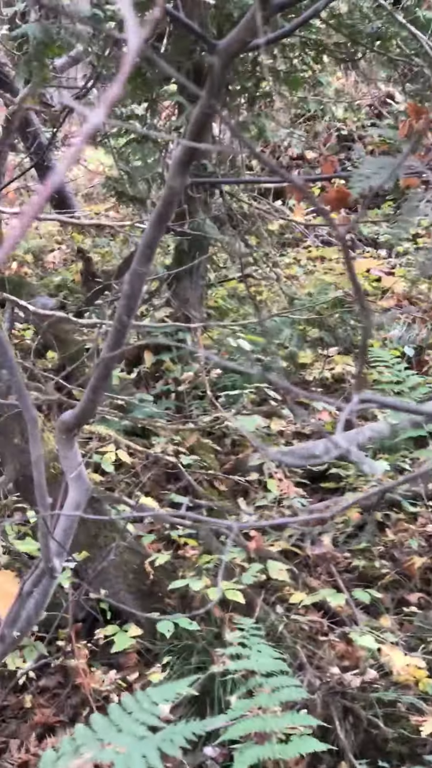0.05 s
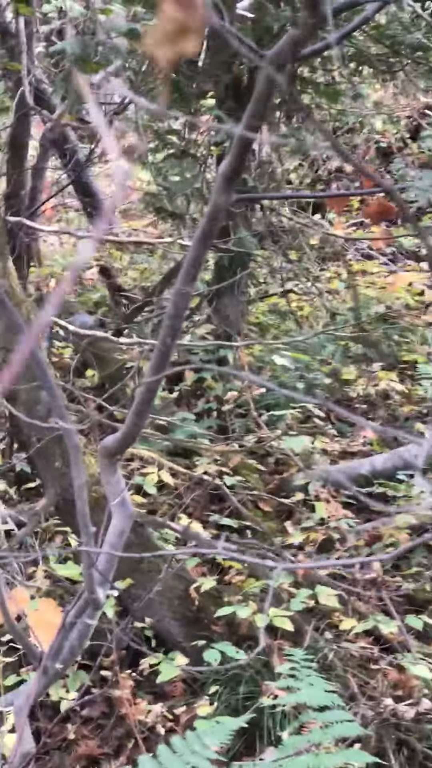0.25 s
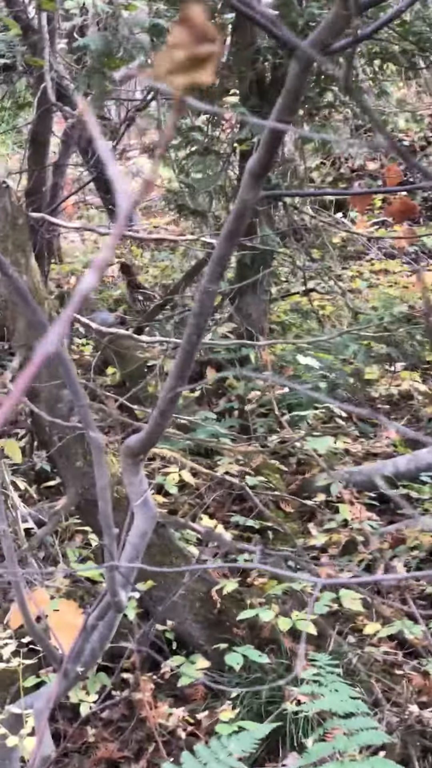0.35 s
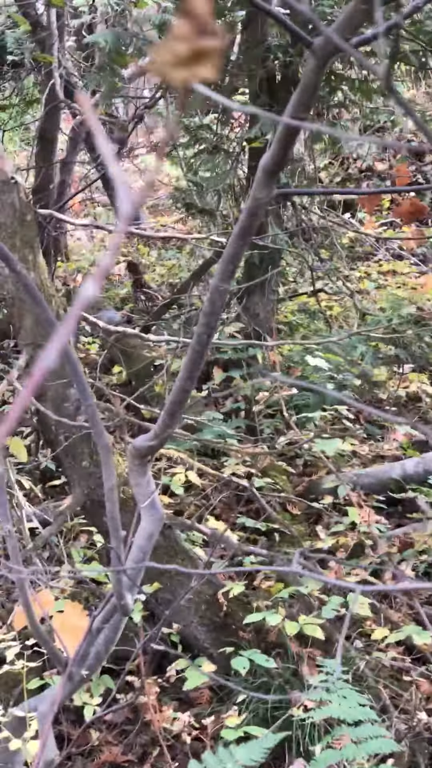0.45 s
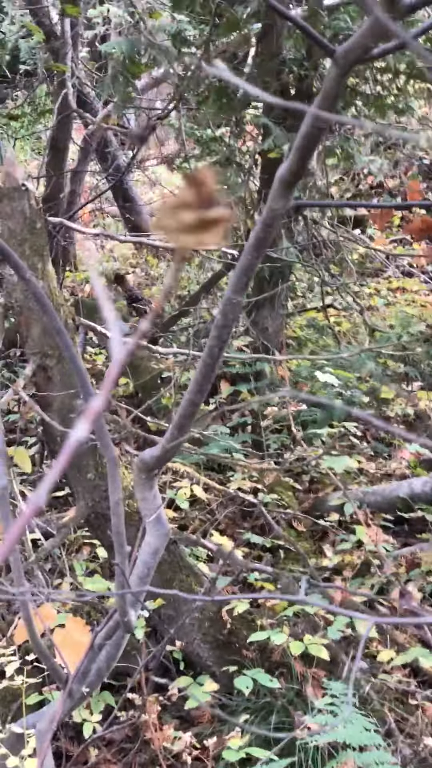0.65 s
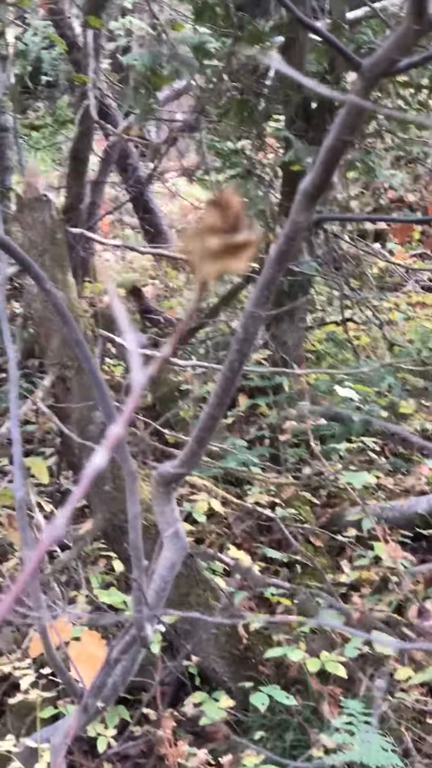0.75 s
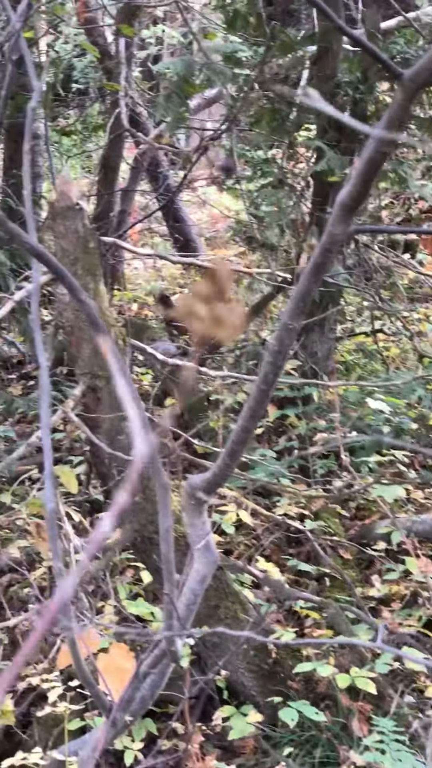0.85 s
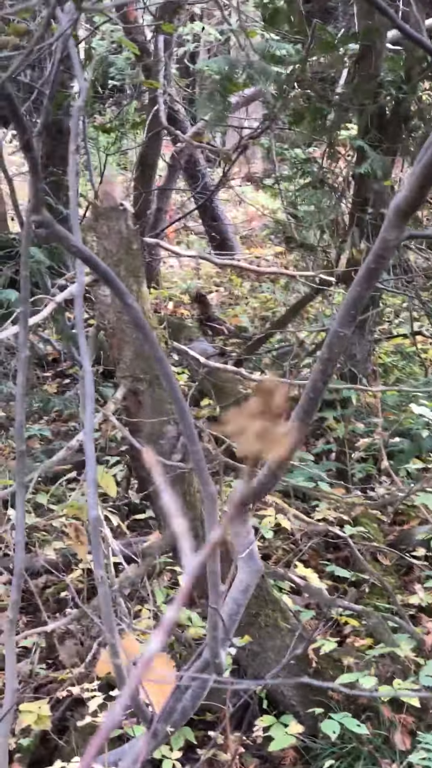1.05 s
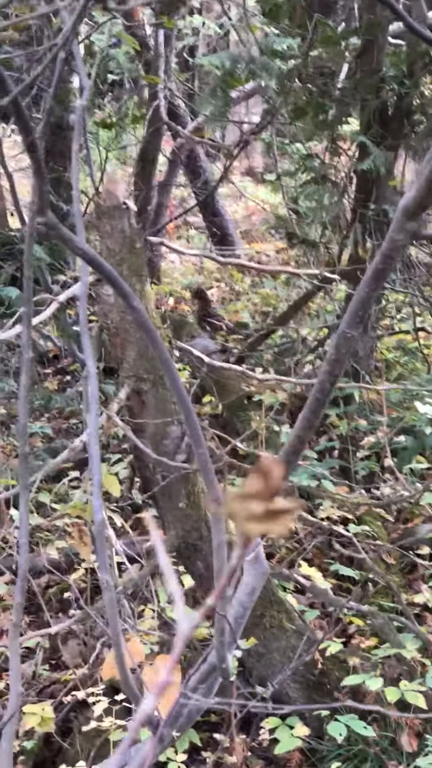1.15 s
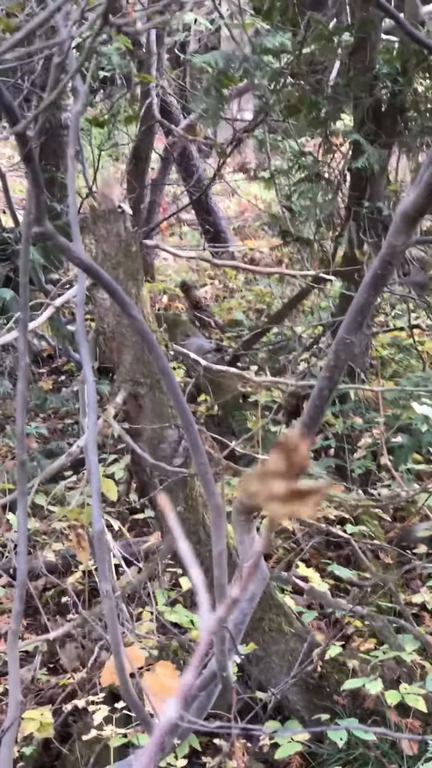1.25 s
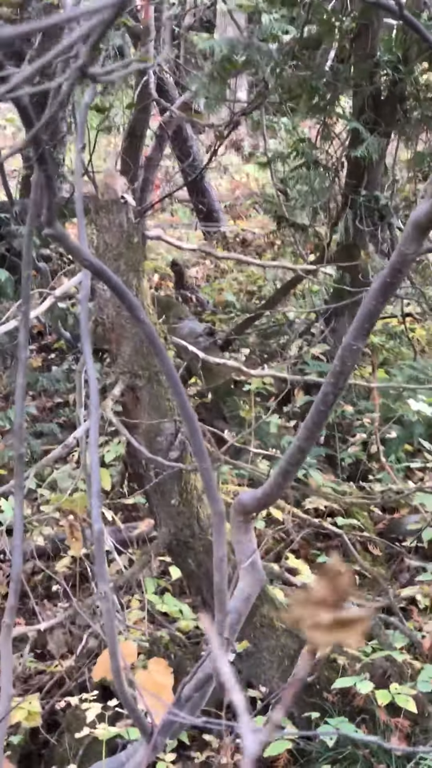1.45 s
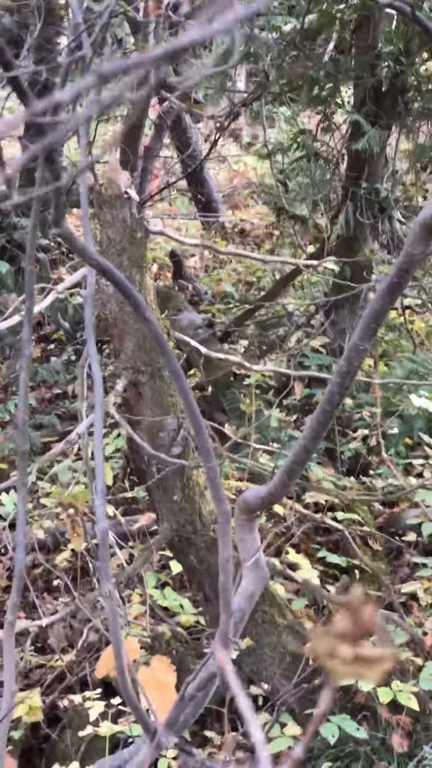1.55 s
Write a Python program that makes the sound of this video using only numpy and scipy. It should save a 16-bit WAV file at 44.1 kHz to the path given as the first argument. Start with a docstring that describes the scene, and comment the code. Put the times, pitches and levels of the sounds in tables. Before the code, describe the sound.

Dry twigs snap sharply underfoot among crisp leaves in a quiet autumn wood

```python
"""A walker shifts weight on dry leaves and twigs in a quiet wood, over a faint rustle and still air.
First come a few twig cracks with low thuds of weight, and a far bird gives a short rising whistle.
Near a quarter second many twigs snap in a rush, each a click with a knock that falls in pitch,
while leaves scrape in bursts of tiny grains. Fewer snaps, scrapes and thuds follow, weaker later on;
the bird whistles again, the last time near the end, just before a last soft thud."""
import sys
import numpy as np
from scipy import signal
from scipy.io import wavfile

SR = 44100
rng = np.random.default_rng(int(sys.argv[2]) if len(sys.argv) > 2 else 0)


def boost_factor(decibels):
    """Convert a level in decibels to a linear amplitude factor."""
    exponent = np.asarray(decibels, float) / 20
    return 10 ** exponent


def to_wav(s):
    """Save 16-bit WAV."""
    ch = np.atleast_2d(s).T  # columns
    pcm = np.round(np.clip(ch, -1, 1) * 32767)  # PCM
    wavfile.write(sys.argv[1], SR, pcm.astype(np.int16))


N = 70560  # samples, 1.6 s


def rms_one(x):
    """Scale a sound to an rms of 1."""
    return x / np.sqrt(np.mean(x ** 2) + 1e-20)


def add(out, start_s, x):
    """Mix a short sound into a longer one, cutting what runs past the end."""
    i = int(start_s * SR)
    out[i:i + len(x)] += x[:max(len(out) - i, 0)]


def band(x, hz, octaves):
    """Keep a band of pitches around a centre, as a broad resonance does."""
    edges = hz * 2 ** (np.array([-.5, .5]) * octaves)
    edges = np.clip(edges, 20, [15000, 19000])
    return signal.sosfilt(signal.butter(2, edges, "band", fs=SR, output="sos"), x)


def drift(rate_hz):
    """Slow random wander around 0 with an rms of 1: noise smoothed by two equal low-passes."""
    r = np.exp(-2 * np.pi * rate_hz / SR)
    noise = rng.standard_normal(N + SR)
    slow = signal.lfilter([1], [1, -2 * r, r * r], noise)[SR:]  # drop the filter's first second
    return rms_one(slow - slow.mean())


def grains(size, rate_per_s, spread_db):
    """Random one-sample clicks of uneven size and either sign."""
    chance, strength, sign = rng.random((3, size))
    hit = chance < rate_per_s / SR
    return hit * boost_factor(-spread_db * np.log(strength + 0.01)) * np.sign(sign - .5)


def coloured(spectrum, patchy_db, flicker_hz):
    """Noise bands half an octave apart, each flickering partly with the others; rms 1."""
    out, together = 0, drift(flicker_hz)
    white = rng.standard_normal((2, N))  # neighbouring bands use different noise
    f, level = np.transpose(spectrum)
    for k, hz in enumerate(30 * 2 ** np.arange(0, 9.6, .5)):
        gain_db = np.interp(np.log(hz), np.log(f), level)
        gain_db = gain_db + patchy_db * (together + drift(flicker_hz))
        out = out + boost_factor(gain_db) * band(white[k % 2], hz, 0.65)
    return rms_one(out)


def crack(hz):
    """A breaking fibre: one click and a frayed burst that ring briefly near one pitch; peak 1."""
    t = np.arange(600) / SR
    t60_s, fray_db, wide_db = 0.004, -13, -2
    burst = boost_factor(fray_db) * rng.standard_normal(len(t)) * boost_factor(-60 * t / t60_s)
    burst[0] = 1  # the click
    x = band(burst, hz, 1.1) * 2 + boost_factor(wide_db) * band(burst, 3540, 2.4)
    return x / np.abs(x).max()


# twigs snapping: (t/s, crack level/dB, crack f/Hz, knock level/dB)
TWIG_SNAPS = [(0.0888, -22.5, 3800, -43.5), (0.0924, -29, 3850, -54), (0.1446, -38, 6400, -55),
              (0.2108, -22, 2830, -40), (0.2287, -12.5, 5730, -32), (0.2347, -4, 7600, -28.5),
              (0.2394, -7.5, 8200, -27.5), (0.2417, -5.5, 5100, -34), (0.2466, -2.5, 6030, -29),
              (0.2505, -6, 5470, -27.5), (0.2586, -33, 4960, -32), (0.2903, -18, 3830, -37.5),
              (0.2994, -34, 4500, -48), (0.4589, -19.5, 5830, -34.5), (0.6158, -11.5, 3430, -28),
              (0.6195, -25, 4800, -28.5), (0.6378, -31.5, 5300, -36), (0.6478, -39, 5000, -43),
              (0.7032, -34, 10300, -36.5), (0.717, -20, 2900, -41.5), (0.7207, -38, 6100, -49),
              (0.7235, -29.5, 4330, -63), (0.733, -25.5, 13300, -62), (0.8546, -31, 12000, -49),
              (0.9108, -35, 7560, -71), (.978, -35, 9700, -79), (1.133, -30.5, 8400, -47.5),
              (1.156, -44, 13500, -65), (1.279, -24, 3750, -43), (1.305, -29, 3730, -52),
              (1.32, -34.5, 8600, -48), (1.358, -38.5, 6800, -68)]


def snaps():
    """Crack, then the bending wave of the twig: high pitch arrives first, low later."""
    out, t = np.zeros(N), np.arange(2000) / SR
    fall_s, t60_s = 0.001026, 0.029
    pitch_hz = 3000 / (1 + t / fall_s) ** 1.1  # for a twig of size factor 1
    shape = (1 - np.exp(-t / fall_s)) * boost_factor(-60 * t / t60_s)
    shape = shape / shape.max()
    for start_s, crack_db, hz, knock_db in TWIG_SNAPS:
        add(out, start_s, boost_factor(crack_db) * crack(hz))
        pitch_factor = rng.uniform(0.717, 1.315)  # no two knocks alike
        rough = 1 + 2 * band(rng.standard_normal(len(t)), 500, 2.0)
        knock = np.sin(2 * np.pi * pitch_factor * np.cumsum(pitch_hz) / SR)
        add(out, start_s, boost_factor(knock_db) * rough * shape * knock)
    return out


# leaves scraping: (start t/s, length t/s, level/dB, centre f/Hz, width/octaves)
LEAF_SCRAPES = [(0.184, 0.01, -52, 5470, 0.69), (0.198, 0.019, -52.5, 3870, 2.2),
                (0.227, 0.011, -32.5, 6000, 5.2), (0.239, 0.0061, -25, 6660, 0.6),
                (0.2504, 0.0039, -21.5, 6400, 4.8), (0.258, 0.044, -45, 3950, 1.93),
                (.2675, .006, -40, 13000, .7), (.2815, 0.004, -36.5, 4700, .6),
                (.6235, .005, -44, 11500, 1.2), (0.7175, .0045, -46, 8900, 3), (0.308, 0.014, -48, 3000, 4),
                (0.355, 0.02, -50.5, 4270, 0.44), (0.384, 0.0078, -50, 4450, 1.45),
                (0.438, 0.033, -55.5, 6900, 1.4), (0.447, 0.019, -43.5, 5860, 2.4),
                (.472, 0.0063, -47, 11000, 1.8), (0.547, 0.024, -62, 4960, 2.6),
                (0.62, 0.02, -42.5, 4040, 1.43), (0.7, 0.012, -52.5, 4870, 1.4),
                (0.726, 0.0048, -42, 11000, 3.5), (0.806, 0.0078, -54, 5960, 3.1),
                (0.864, 0.039, -52.5, 9800, 3.3), (0.98, 0.0096, -54, 11200, 2),
                (1.138, 0.021, -53, 9900, 1.05), (1.13, 0.021, -52, 795, 0.91),
                (1.189, 0.0066, -54.5, 10100, 0.85), (1.19, 0.01, -54, 845, 1.5),
                (0.637, 0.0038, -30, 1300, 0.48), (0.92, 0.049, -58.5, 11900, 1.8)]


def scrapes():
    """Leaves rub in dense grains, heard through a broad leaf resonance."""
    out, t = np.zeros(N), np.arange(3500) / SR
    knots_s = np.arange(0, .09, .003)
    for start_s, length_s, db, hz, octaves in LEAF_SCRAPES:
        edge_s = .001 + .15 * length_s
        shape = np.clip(np.minimum(t, length_s - t) / edge_s + .5, 0, 1)
        lumps_db = rng.normal(0, 3.5, len(knots_s))  # the rubbing is uneven
        shape = shape * boost_factor(np.interp(t, knots_s, lumps_db)) * (t < 1.3 * length_s)
        rub = band(grains(len(t), rate_per_s=5500, spread_db=3.5), hz, max(octaves, .2))
        add(out, start_s, boost_factor(db) * shape * rms_one(rub))
    return out


# low thuds and creaks of weight on the ground: (t/s, level/dB, f/Hz, 60 dB decay t/s)
WEIGHT_THUDS = [(.0905, -39, 579, 0.027), (0.218, -36.5, 94, 0.087), (0.239, -37, 257, 0.045),
                (0.2502, -20, 280, 0.029), (0.26, -29, 100, 0.17), (.268, -31, 190, 0.1),
                (0.286, -30.5, 87, 0.048), (0.336, -39.5, 100, 0.14), (0.473, -33.5, 516, 0.035),
                (0.49, -43, 170, 0.071), (0.625, -29.5, 294, 0.042), (0.634, -30, 112.5, 0.041),
                (0.7187, -36.5, 498, 0.019), (.213, -36, 448, 0.046), (1.25, -41.5, 173.6, 0.12),
                (1.283, -41.5, 175, 0.079), (1.384, -40, 307, 0.02), (1.562, -43.5, 466, 0.025)]


def thuds():
    """Soft pushes on the ground, each ringing a few low cycles."""
    out, t = np.zeros(N), np.arange(SR // 4) / SR
    rise_cycles = 0.19
    for start_s, db, hz, t60_s in WEIGHT_THUDS:
        shape = (1 - np.exp(-t * hz / rise_cycles)) * boost_factor(-60 * t / t60_s)
        add(out, start_s, boost_factor(db) * shape / shape.max() * np.sin(2 * np.pi * hz * t))
    return out


# leaf litter settling: (t/s, ground rumble level/dB, scuffing level/dB, treble rustle level/dB)
LITTER_LEVELS = [(0, -65, -58.5, -64), (.12, -64, -57, -55), (.2, -67, -57, -58.5), (.33, -50.5, -58, -59),
                 (.4, -74, -56.5, -57), (.5, -56, -55.5, -58), (.6, -60.5, -58, -57.5),
                 (.7, -56, -59.5, -60.5), (.78, -63, -60, -66), (.86, -61.5, -60, -63),
                 (.95, -70.5, -63.5, -68), (1.11, -64, -64.5, -60.5), (1.136, -52.5, -55, -57),
                 (1.22, -56.5, -60, -64), (1.36, -59, -52, -58.5), (1.45, -63, -54.5, -59.5),
                 (1.52, -53.5, -59, -58.5), (1.6, -55, -56.5, -57)]
# tone of the scuffing: (f/Hz, relative level/dB per Hz)
SCUFF_SPECTRUM = [(88, -23), (150, -15.5), (193, -6.5), (384, -11), (3000, -24), (3900, -41), (6600, -120)]
# tone of the treble rustle: (f/Hz, relative level/dB per Hz)
RUSTLE_SPECTRUM = [(880, -9), (1500, -11.5), (4650, -9), (5160, -11), (12000, -29), (15600, -73),
                   (22000, -120)]


def litter():
    """Leaves settle: ground rumble, lumpy scuffing, finer treble rustle, sparse ticks."""
    s, *levels = np.transpose(LITTER_LEVELS)
    rumble, scuff, rustle = [boost_factor(np.interp(np.arange(N) / SR, s, db)) for db in levels]
    ticks = 0
    for hz in (2500, 5000, 10000):
        clicks = grains(N, rate_per_s=75, spread_db=2.9) + 1e-18  # never quite zero
        ticks = ticks + band(clicks, hz, 0.97)
    treble = coloured(RUSTLE_SPECTRUM, patchy_db=4.0, flicker_hz=59.0) + boost_factor(12) * ticks
    return (rumble * rms_one(band(rng.standard_normal(N), 100, 1.77))
            + scuff * coloured(SCUFF_SPECTRUM, patchy_db=1.5, flicker_hz=46.6)
            + rustle * treble)


# bird whistles: (start t/s, length t/s, level/dB, start f/Hz, end f/Hz)
BIRD_WHISTLES = [(.15, .03, -62, 4500, 5700), (.829, .034, -60, 4150, 5500), (1.07, .036, -61, 4300, 5600),
                 (1.539, .027, -57, 4750, 5650)]


def bird():
    """Short rising whistles, blurred by distance: the level flutters and an echo trails."""
    out = np.zeros(N)
    for start_s, length_s, db, start_hz, end_hz in BIRD_WHISTLES:
        u = np.linspace(0, 1, int(length_s * SR))
        pitch_hz = start_hz + (end_hz - start_hz) * u
        swell = np.sqrt(2 * u * np.abs(np.sin(np.pi * u)))
        add(out, start_s, boost_factor(db) * swell * np.sin(2 * np.pi * np.cumsum(pitch_hz) / SR))
    flutter_db, echo_db, echo_s = 4.5, -8, .008
    out = out * boost_factor(flutter_db * drift(160))
    return out + boost_factor(echo_db) * np.roll(out, int(echo_s * SR))


# tone of the still air: (f/Hz, relative level/dB per Hz)
AIR_SPECTRUM = [(35, -58), (60, -6), (208, -13), (12200, -23.5), (15400, -21.5), (16500, -51)]


def still_air():
    """Steady faint noise with a slight flicker in each band."""
    return boost_factor(-61.5) * coloured(AIR_SPECTRUM, patchy_db=1.0, flicker_hz=20)


def scatter(near):
    """Trunks and ground throw back a short, noisy, dying echo, added to the near sounds."""
    t = np.arange(SR // 5) / SR
    echo_db, t60_s = -19, .07
    echo = rng.standard_normal(len(t)) * boost_factor(-60 * t / t60_s)
    echo = echo / np.sqrt(np.sum(echo ** 2))
    return near + boost_factor(echo_db) * signal.fftconvolve(near, echo)[:N]


def scene():
    """Twigs, leaves and soles with their scatter, then litter, bird and air."""
    near = scatter(snaps() + scrapes() + thuds())
    return (near + litter() + bird() + still_air())[None]


def roll_off(x):
    """The treble ends steeply here."""
    return signal.sosfilt(signal.butter(12, 16840, fs=SR, output="sos"), x)


def record(dry):
    """Top treble and deep bass roll off."""
    soft = signal.sosfilt(signal.butter(6, 16000, fs=SR, output="sos"), dry)
    soft = signal.sosfilt(signal.butter(2, 45, "high", fs=SR, output="sos"), soft)
    return roll_off(soft)


dry = scene()
out = record(dry)
to_wav(out)
```